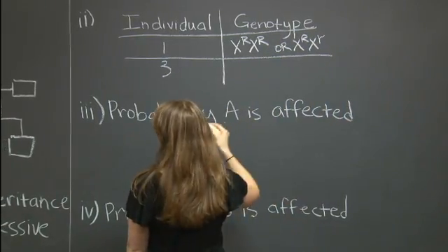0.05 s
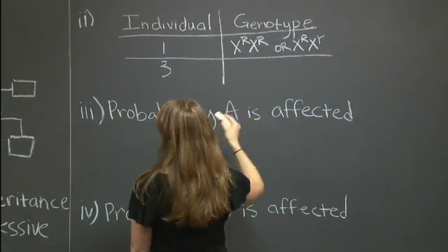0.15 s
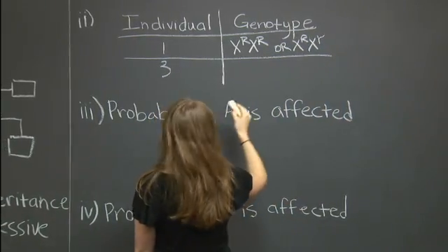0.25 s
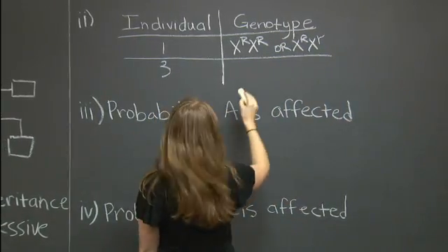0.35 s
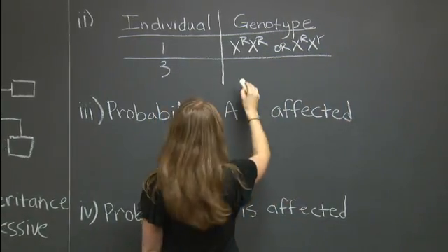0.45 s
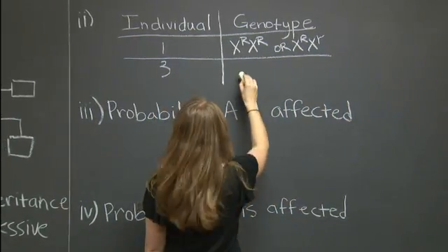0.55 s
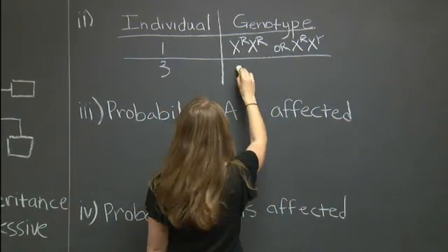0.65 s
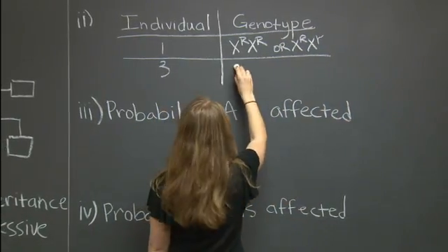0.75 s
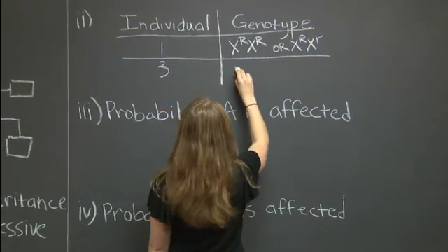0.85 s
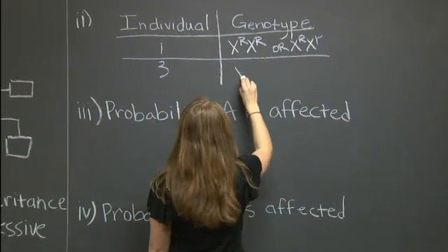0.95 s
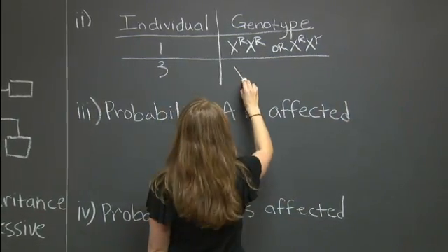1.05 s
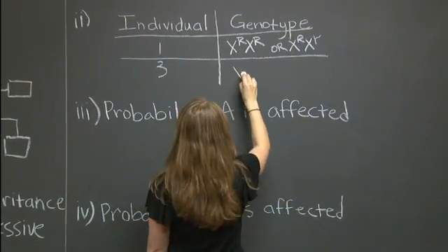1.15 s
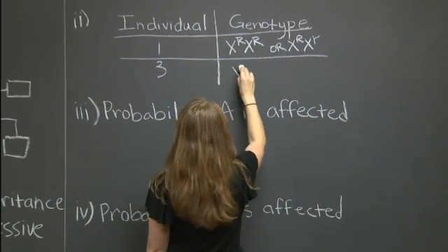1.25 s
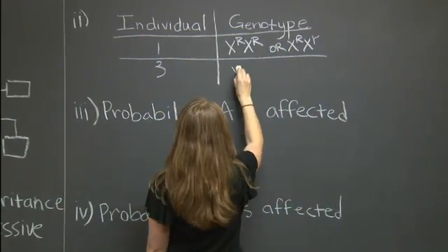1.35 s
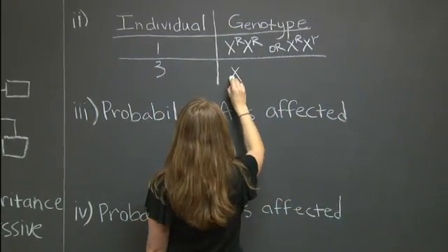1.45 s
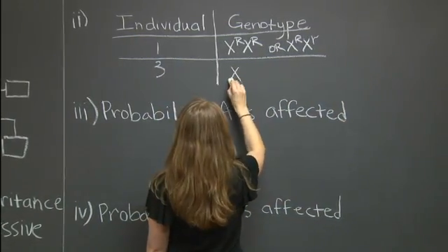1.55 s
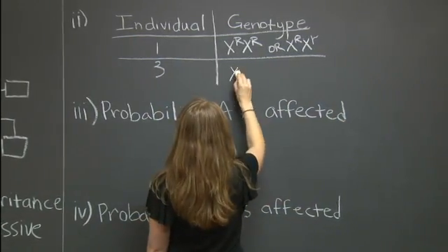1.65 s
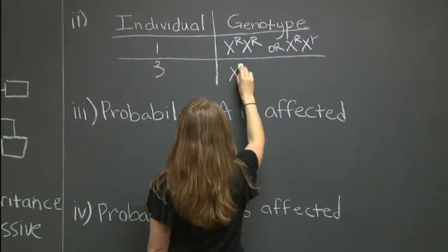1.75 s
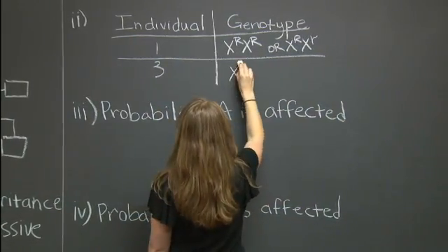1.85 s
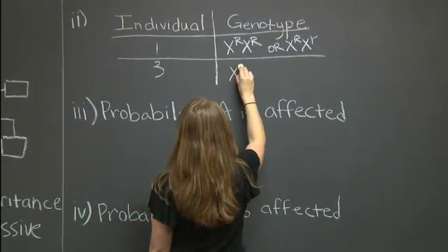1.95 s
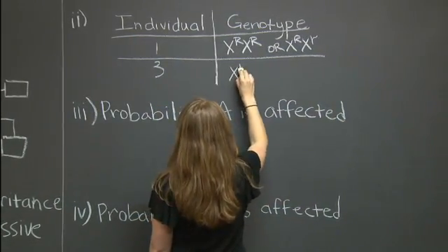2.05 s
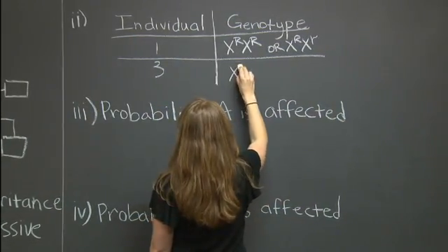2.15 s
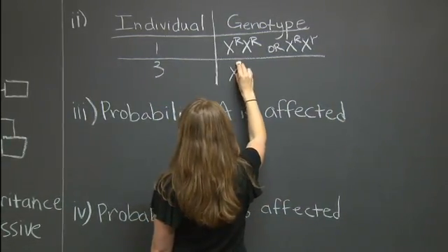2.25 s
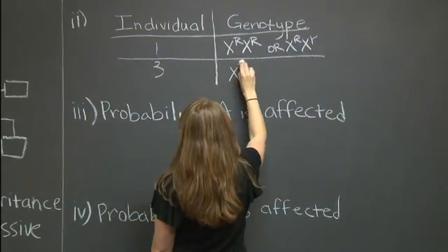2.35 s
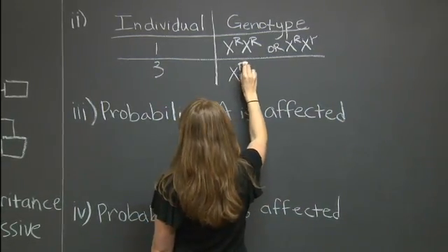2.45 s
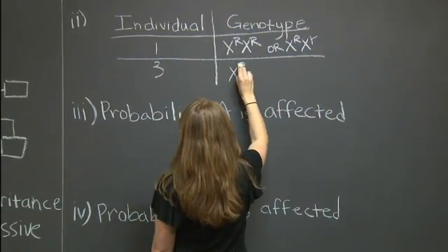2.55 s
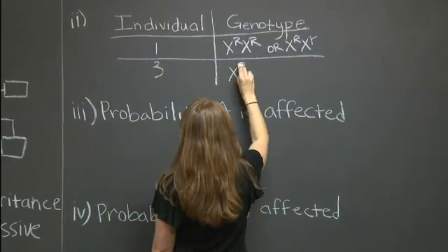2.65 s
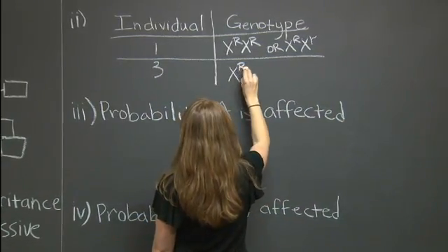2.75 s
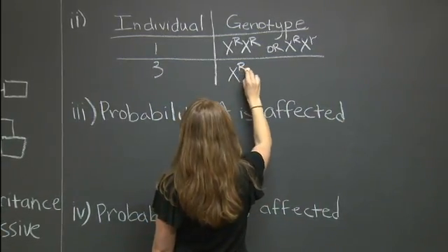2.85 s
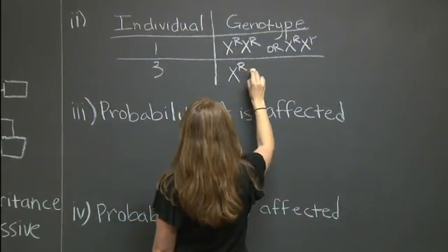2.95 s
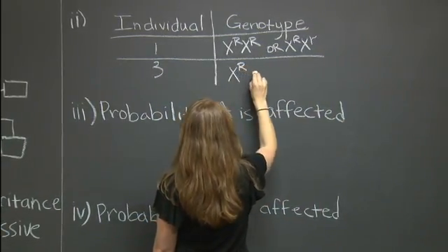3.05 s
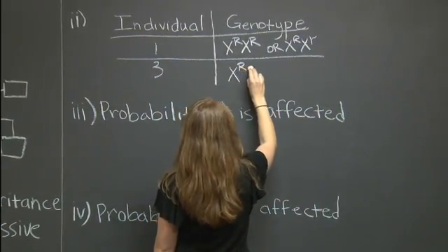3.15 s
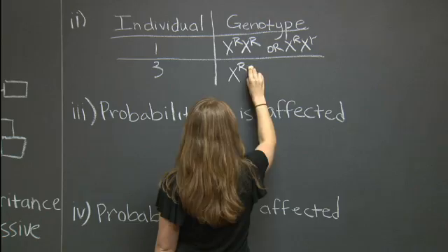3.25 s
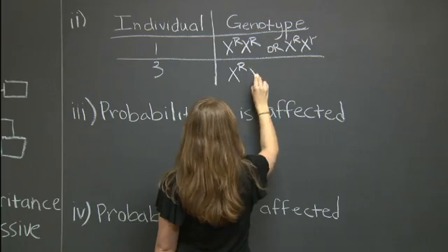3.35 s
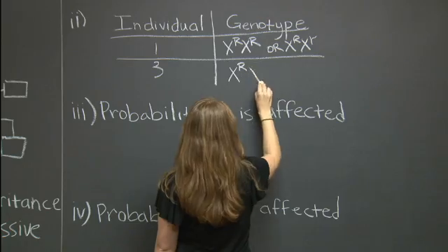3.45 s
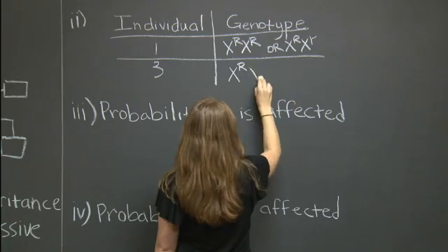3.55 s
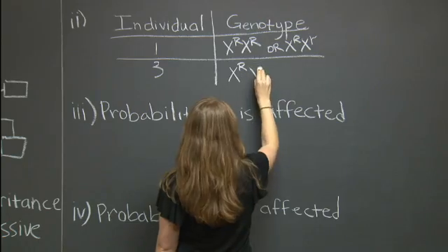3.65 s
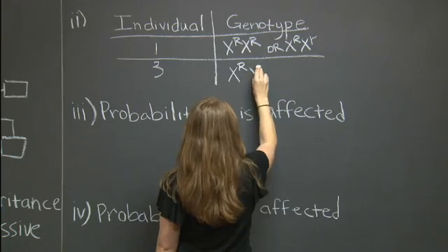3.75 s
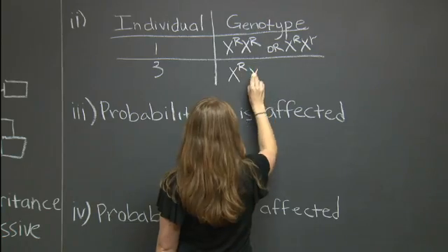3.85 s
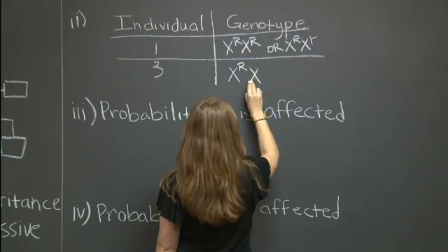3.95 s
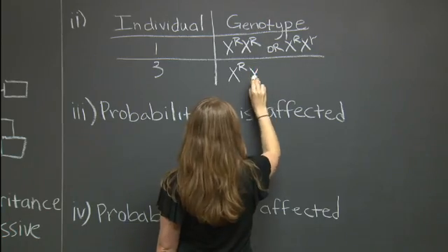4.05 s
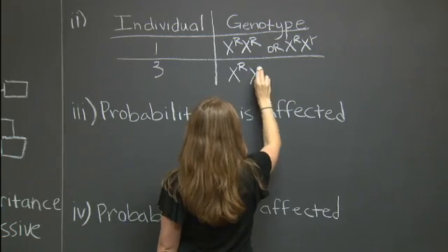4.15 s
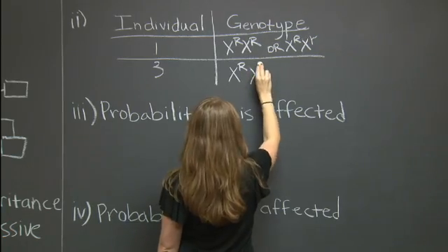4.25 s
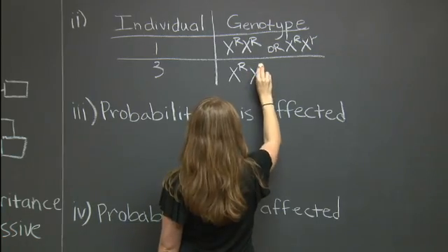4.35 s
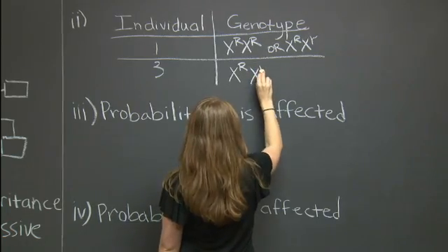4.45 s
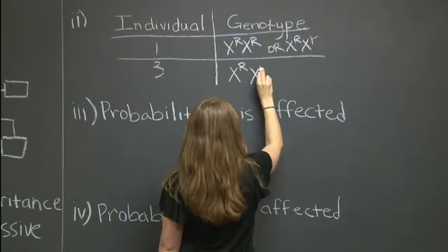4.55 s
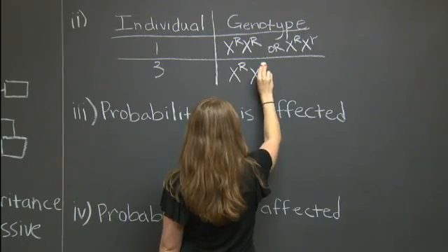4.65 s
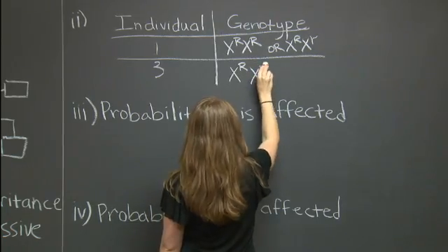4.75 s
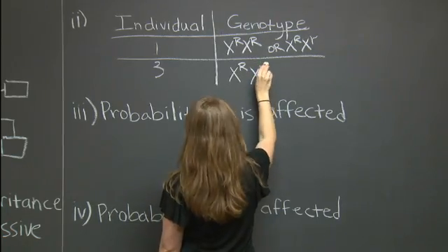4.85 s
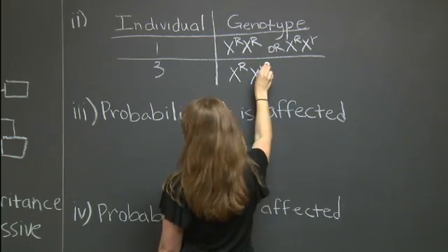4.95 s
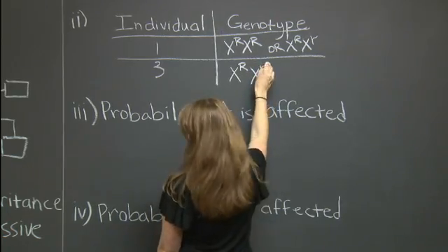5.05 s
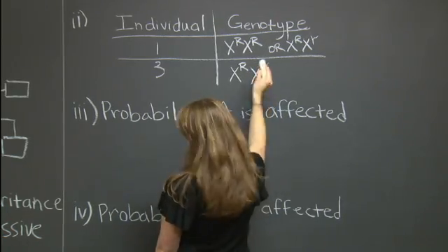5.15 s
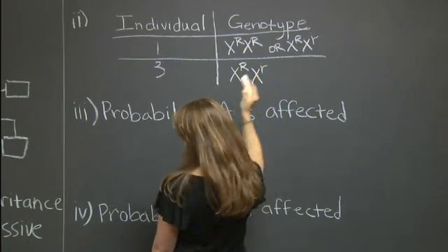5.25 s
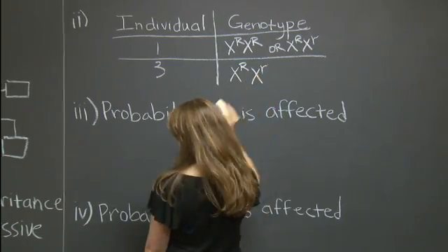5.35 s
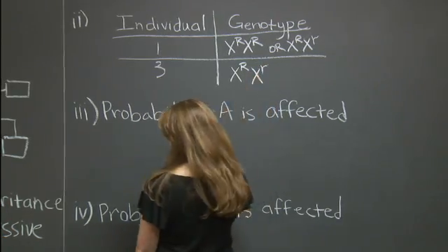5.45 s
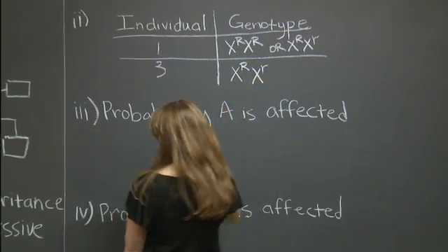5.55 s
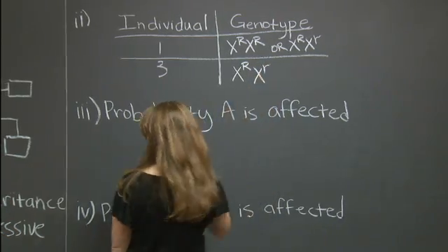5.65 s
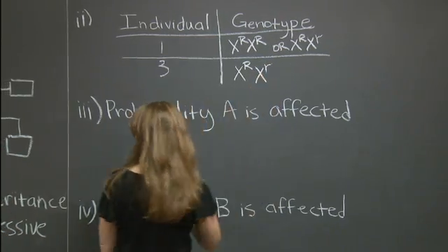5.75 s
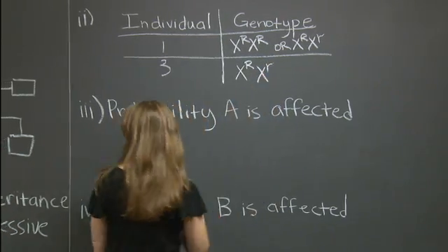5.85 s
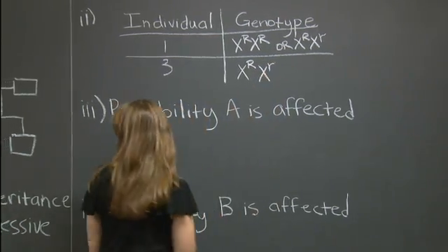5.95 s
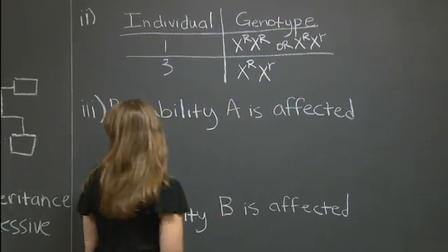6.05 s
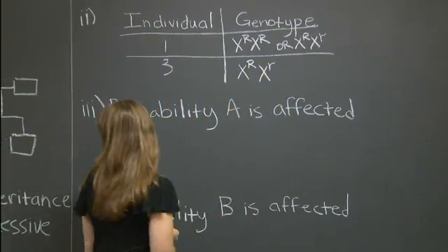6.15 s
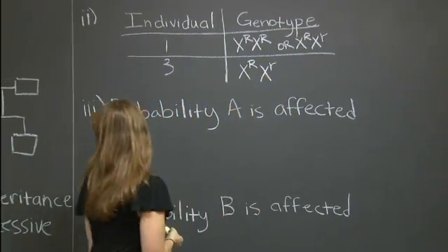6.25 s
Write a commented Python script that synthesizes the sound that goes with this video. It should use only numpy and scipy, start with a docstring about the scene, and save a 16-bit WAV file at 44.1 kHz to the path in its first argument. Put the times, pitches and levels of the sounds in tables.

```python
"""A quiet, ventilated classroom, where someone writes a few letters with chalk on a blackboard.
Most strokes begin with a tap: the board rings with a knock and the chalk tip crumbles a little.
Then the chalk scrapes over the slate, catching and slipping thousands of times a second.
Now and then the hand rubs faintly on the board, or the chalk knocks lightly as it lifts off.
At the end the writer steps aside with a faint rustle of clothes. Air rushes softly throughout."""
import sys
import numpy as np
from scipy import signal
from scipy.fft import rfft, irfft
from scipy.io import wavfile

SR = 44100
rng = np.random.default_rng(int(sys.argv[2]) if len(sys.argv) > 2 else 0)


def unload_audio(sound):
    """Save the sound as a 16-bit wav file, at the path given as the first command line argument."""
    columns = np.transpose(np.atleast_2d(sound))
    # keep every value between -1 and 1, then stretch to whole-number steps
    steps = np.round(np.clip(columns, -1, 1) * 32767)
    wavfile.write(sys.argv[1], SR, steps.astype(np.int16))


N = 277389
TIME, FREQS = np.arange(N) / SR, np.fft.rfftfreq(N, 1 / SR)

# Levels in the tables are relative. A t60 is the time a sound takes to fade by 60 dB.
# Chalk strokes and faint rubs of the hand on the board:
# t/s, length/s, fastest point/share of length, starting speed/share of top speed,
# hiss/dB, rasp/dB, pressure change/dB, drone against rasp/dB,
# then three resonances (boosted pitches) set by grip and angle, each f/Hz, boost/dB
STROKES_AND_RUBS = [ (0.847, 0.25, 0.62, 0.29, -62.5, -54.5, -0.5, -8.5, 1630, 6, 3980, 1, 7900, 7),
                    (1.394, 0.2, 0.46, 0.48, -62, -53.5, -7, -8.5, 1560, 3.3, 4020, 4.5, 9100, 3),
                    (1.923, 0.232, 0.38, 0, -68, -57.5, -1, -9, 2600, -1, 4020, 8.5, 8600, 6),
                    (2.335, 0.2, 0.47, 0, -68.5, -57, -6, -2, 1330, 10.5, 3350, 9, 11700, 8),
                    (2.497, 0.16, 0.65, 0.3, -67, -57.5, -3, -4, 2470, 7, 3920, 7, 6900, 4.4),
                    (2.72, 0.18, 0.35, 0.1, -68.5, -57, -1, -5.5, 1200, 5, 2600, 6.2, 3470, 7),
                    (3.29, 0.26, 0.39, 0, -58.5, -52, -3.5, -14.5, 1640, 4, 4080, 6, 8150, 6.5),
                    (3.56, 0.21, 0.6, 0.45, -97, -79, 0, 8, 700, 10, 950, 9.5, 2200, 12),
                    (3.8, 0.28, 0.4, 0.1, -62.5, -53.5, -9.5, -12.5, 1640, 6.5, 2100, 6, 3520, 7),
                    (4.36, 0.2, 0.64, 0.18, -69, -55, -0.5, -12, 1620, 3.5, 4000, 9, 8000, 5),
                    (4.579, 0.2, 0.79, 0.67, -72.5, -61.5, -1, 5.5, 770, 5.5, 1180, 3.5, 3400, 9),
                    (4.78, 0.41, 0.4, 0.5, -96, -75.5, 0, 8.5, 636, 17, 895, 14, 2200, 15)]
# Tone of the hiss at the chalk tip: f/Hz, level/dB
HISS_SPECTRUM = [(2000, -24.5), (2850, -7.5), (3400, 1.5), (4300, 5.5), (4800, -4.5), (5800, 5),
                 (7400, -0.5), (8400, -1), (9800, -7), (10700, -12), (12400, -6), (13700, -11.5),
                 (14900, -14), (15600, -26)]
# Tone of the rasp in the stick and hand: f/Hz, level/dB
RASP_SPECTRUM = [(300, -19), (900, -17), (1120, -3), (1420, -8), (1540, 1.5), (1680, -0.5), (1800, -1.5),
                 (1980, -1.5), (2250, -9.5), (2480, -12), (2800, -24.5), (4000, -35.5)]
# Tone of the scraped board's drone: f/Hz, level/dB
DRONE_SPECTRUM = [(200, -12), (400, -27.5), (560, -6), (760, -3), (950, -2), (1200, 2), (1450, -4),
                  (2000, -41.5)]
# Chalk knocking on the board as it lands or lifts off: t/s, knock/dB,
# knock cutoff/Hz (lower is softer), crunch/dB, crunch tilt/(dB per octave), ring of the tip/Hz
TAPS = [(0.7768, -31.5, 560, -47.5, 2.5, 8800), (1.3669, -31, 706, -49.5, -1.5, 4150),
        (1.8961, -32.5, 1305, -46.5, -6, 6170), (2.3082, -29, 975, -48, -2, 15200),
        (3.2726, -27.5, 1480, -46, 3, 4210), (3.7983, -25.5, 2050, -41, -1, 3410),
        (4.043, -67, 1100, -80, 0, 4000), (4.3304, -28.5, 1230, -48.5, 3, 12500),
        (4.829, -72, 1988, -84, 0, 3990), (5.128, -76, 1500, -80, 4.5, 3970),
        (5.397, -62, 890, -78.5, 0.5, 4040)]
# The board's modes, the tones it rings with when hit: f/Hz, level/dB, t60/s
BOARD_MODES = [(311.9, -5, 0.153), (377.4, -7.5, 0.037), (427, -1, 0.05), (467, -16.5, 0.2),
               (634, -25, 0.3), (692, -14, 0.12), (729.6, -12.5, 0.05), (815, -2.5, 0.035), (878, -21, 0.2),
               (990, 4, 0.06), (1077, -26.5, 0.13), (1160, -1, 0.034), (1290, 5.5, 0.017),
               (1436, 3.5, 0.049), (1620, -2, 0.051), (1641, 12.5, 0.14), (1803, -16.5, 0.14),
               (1898, 3, 0.028), (2090, 10.5, 0.017), (2227, -8, 0.071), (2480, -8.5, 0.034),
               (2740, -5, 0.027), (3353, 9, 0.02)]
# Tone of the crumbling tip: f/Hz, level/dB
CRUNCH_SPECTRUM = [(200, -42), (1500, -13.5), (2700, -6.5), (3900, 1.5), (4900, -1), (6600, 4),
                   (8200, -6.5), (9300, -1.5), (11500, -11.5), (15500, -8.5), (17000, -27.5)]
# First echoes of a tap: delay/ms, gain/factor
EARLY_ECHOES = [(1.61, .84), (2.62, .48), (8.15, .2)]
# How long the classroom echoes: f/Hz, t60/s
ROOM_DECAY = [(250, 0.32), (700, 0.31), (1500, 0.11), (3000, 0.24), (10000, 0.17)]
# The arm reaches up, later the body turns and steps aside: t/s, length/s, level/dB
BODY_MOVES = [(-0.15, 0.12, -63.5), (0.415, 0.24, -67), (5.299, 0.23, -68.5), (5.43, 0.55, -63.5),
              (6.05, 0.28, -67.5)]
# Tone of rubbing clothes: f/Hz, level/dB
CLOTH_SPECTRUM = [(150, 7), (350, -4.5), (560, 5.5), (780, -5.5), (950, -3), (1500, -7), (2250, -6.5),
                  (2600, -14), (3200, -13), (4000, -17), (6000, -24.5), (10000, -28.5), (15000, -29)]
# Soft footsteps: t/s, level/dB, length/s
FOOTSTEPS = [(5.522, -60.5, 0.28), (5.69, -57.5, 0.072)]
# Tone of a thud on the floor: f/Hz, level/dB
FLOOR_SPECTRUM = [(20, -5), (35, 5.5), (80, 0), (170, -9), (300, -7), (700, -59)]
# Tone of the rushing air: f/Hz, level/dB
AIR_SPECTRUM = [(15, -38.5), (25, -18.5), (50, 3), (80, 0), (175, 1), (250, -6.5), (300, -7.5), (370, -15),
                (650, -17.5), (1000, -23.5), (2100, -28.5), (4000, -33.5), (12000, -41), (15000, -56)]
# Faint steady whine in the room: f/Hz, level/dB
WHINE_TONES = [(1380, -89.5), (1995, -95), (2825, -97)]


def scrapes_and_rubs(slips_per_s=14000, chatter_db=0.5, chatter_hz=70, rasp_trim_db=-3.0):
    """Chalk or hand slides in countless tiny slips that hiss, rasp and make the board drone."""
    slips = rng.standard_normal(N) * (rng.random(N) < slips_per_s / SR)
    slips *= amp(chatter_db * flutter(chatter_hz))  # the grip varies along the way
    out = np.zeros(N)
    for row in STROKES_AND_RUBS:
        start, length, fastest, first_speed, hiss_db, rasp_db, press_db, drone_db, *boosts = row
        touching = (TIME > start) & (TIME < start + length)
        t, friction = TIME[touching] - start, slips[touching]
        peaks = np.reshape(boosts, (-1, 2))
        speed, contact = hand_motion(t, length, fastest, first_speed)
        pressure = amp(press_db * (t / length - .5))  # the hand bears down or eases off steadily
        # speed makes the hiss grow more steeply than the rasp
        hiss = amp(hiss_db) * speed ** 2.1 * colour(friction, HISS_SPECTRUM, peaks)
        rasp_gain = amp(rasp_db + rasp_trim_db) * pressure * speed ** 1.1
        rasp = colour(friction, RASP_SPECTRUM, peaks)
        drone = amp(drone_db) * colour(friction[::-1], DRONE_SPECTRUM, peaks)
        out[touching] += contact * (hiss + rasp_gain * (rasp + drone))
    return out


def hand_motion(t, length, fastest, first_speed, end_speed=0.12, bite_s=0.012, lift_s=0.012):
    """The hand speeds up, then slows down. Gives speed and contact with the board, both 0 to 1."""
    arch = np.interp(t / length, [0, fastest, 1], [0, np.pi / 2, np.pi])
    slowest = np.where(arch < np.pi / 2, first_speed, end_speed)
    speed = slowest + (1 - slowest) * np.sin(arch)
    contact = np.clip(np.minimum(t / bite_s, (length - t) / lift_s), 0, 1)
    return speed, contact


def board_knocks(bass_cut_hz=301, crowd_db=-11, crowd_t60=0.29, spread_s=0.0045):
    """Each tap makes the board ring; a softer tap wakes only its lower tones."""
    t = np.arange(SR // 2) / SR
    ring = sum(amp(db - 60 * t / t60) * np.sin(2 * np.pi * hz * t) for hz, db, t60 in BOARD_MODES)
    ring = early_echoes(ring, strength=1)
    ring = butter(ring, bass_cut_hz, "high", order=4)  # the board gives off little bass
    crowd_gain = amp(crowd_db - 60 * t / crowd_t60) * np.minimum(t / spread_s, 1)
    out = np.zeros(N)
    for start, db, cutoff_hz, *_ in TAPS:
        # waves spread over the board and wake a crowd of weak tones, different at every spot
        crowd = butter(rng.standard_normal(len(t)), hz=560, kind="high", order=2)
        crowd = butter(crowd, hz=3200, kind="low", order=6)
        knock = butter(ring + crowd_gain * unit(crowd), cutoff_hz, "low", order=3)
        add(out, start, amp(db) * knock)
    return out


def tip_crunches(trim_db=-9, crumble_s=0.00018, ring_db=-13, ring_t60=0.0097):
    """At each tap the chalk tip crumbles for about a millisecond and rings briefly."""
    t = np.arange(1024) / SR
    hz, lead_s = np.fft.rfftfreq(len(t), 1 / SR), t[-1] / 2
    age = np.maximum(t - lead_s, 0) / crumble_s
    octaves = np.log2(np.maximum(hz / 6000, .5))
    out = np.zeros(N)
    for start, _, _, db, tilt_db, ring_hz in TAPS:
        burst = rng.standard_normal(len(t)) * age * np.exp(-age)
        # the grains break at random moments, but the tip sets their tone
        spectrum = amp(read(CRUNCH_SPECTRUM, hz) + tilt_db * octaves)
        grit = irfft(spectrum * np.exp(1j * np.angle(rfft(burst))))
        ring = np.sin(2 * np.pi * ring_hz * t) * amp(-60 * t / ring_t60)
        add(out, start - lead_s, amp(db + trim_db) * unit(grit))
        add(out, start, amp(db + trim_db + ring_db) * unit(ring))
    return early_echoes(out, strength=0.25)


def early_echoes(x, strength):
    """A sound is followed by its first few reflections, each a delayed, weaker copy."""
    out = x.copy()
    for ms, gain in EARLY_ECHOES:
        add(out, ms / 1000, strength * gain * x)
    return out


def room_echo(x, build_s=0.0055):
    """Many reflections blur into a tail that builds quickly; each pitch fades at its own speed."""
    hz, t, noise = signal.stft(rng.standard_normal(SR // 2), SR, nperseg=256)
    fade = amp(-60 * t / read(ROOM_DECAY, hz)[:, None])
    _, tail = signal.istft(noise * fade, SR, nperseg=256)
    tail *= np.minimum(np.arange(len(tail)) / SR / build_s, 1) ** 2
    return signal.fftconvolve(x, tail / np.linalg.norm(tail))[:N]


def clothes_rustle(crumple_db=0.7, crumple_hz=40, rise_s=0.069, fade_db_per_s=73):
    """Cloth rubs as the writer moves; each rustle swells, holds and dies away."""
    rubbing = rng.standard_normal(N) * amp(crumple_db * flutter(crumple_hz))
    loudness = np.zeros(N)
    for start, length, db in BODY_MOVES:
        swell = np.clip((TIME - start) / rise_s, 0, 1)
        fade_db = fade_db_per_s * np.maximum(TIME - start - length, 0)
        loudness = np.maximum(loudness, swell * amp(db - fade_db))
    return loudness * colour(rubbing, CLOTH_SPECTRUM)


def footsteps():
    """The writer's weight comes down on the floor in two soft thuds."""
    weight = np.zeros(N)
    for start, db, length in FOOTSTEPS:
        add(weight, start, amp(db) * np.hanning(round(length * SR)))
    return weight * colour(rng.standard_normal(N), FLOOR_SPECTRUM)


def ventilation(air_db=-61.5, waver_db=2.1, waver_hz=6, drift_hz=1.7):
    """Moving air makes a low, gently wavering rush, with a faint whine whose pitch drifts a little."""
    rush = amp(air_db + waver_db * flutter(waver_hz)) * colour(rng.standard_normal(N), AIR_SPECTRUM)
    drift = np.cumsum(drift_hz * flutter(hz=1.4)) / SR
    whine = sum(amp(db) * np.sqrt(2) * np.sin(2 * np.pi * (hz * TIME + drift)) for hz, db in WHINE_TONES)
    return rush + whine


def amp(db):
    """Turns decibels into a factor to multiply by."""
    return 10 ** (np.asarray(db) / 20)


def unit(x):
    """Scales a signal to an average strength (rms) of 1."""
    return x / np.sqrt(np.mean(x ** 2) + 1e-20)


def read(points, hz):
    """Looks up a table at any frequency, blending between rows on a pitch-like (log) scale."""
    f, value = np.transpose(points)
    return np.interp(np.log(hz + 1), np.log(f + 1), value)


def add(mix, start_s, sound):
    """Mixes a sound in at the given time."""
    part = mix[max(round(start_s * SR), 0):][:len(sound)]
    part += sound[:len(part)]


def colour(x, spectrum, peaks=(), width_hz=90, widen=0.016):
    """Shapes a signal's tone with a table and optional peaks (f/Hz, boost/dB), at strength 1."""
    hz = np.fft.rfftfreq(len(x), 1 / SR)
    db = read(spectrum, hz)
    for centre, boost_db in peaks:
        db = db + boost_db * np.exp(-((hz - centre) / (width_hz + widen * centre)) ** 2)
    return unit(irfft(rfft(x) * amp(db), len(x)))


def flutter(hz):
    """Random wavering, up to about hz times a second, at strength 1."""
    return unit(irfft(rfft(rng.standard_normal(N)) / (1 + (FREQS / hz) ** 4), N))


def butter(x, hz, kind, order):
    """Keeps the "low" or "high" side of a frequency; a higher order cuts more sharply."""
    return signal.sosfilt(signal.butter(order, hz, kind, fs=SR, output="sos"), x)


def scene(board_echo_db=-17, writing_echo_db=-18):
    """Knocks and writing echo in the room, over the writer's movements and the air, in mono."""
    board = board_knocks()
    writing = tip_crunches() + scrapes_and_rubs()
    echo = room_echo(amp(board_echo_db) * board + amp(writing_echo_db) * writing)
    return (board + writing + echo + clothes_rustle() + footsteps() + ventilation())[None]


def record(dry, ceiling=.43, top_hz=15650):
    """Rounds off the peaks of the hardest knock, then removes the very highest treble."""
    rounded = dry / (1 + (dry / ceiling) ** 6) ** (1 / 6)
    treble_cut = signal.firwin(401, top_hz, window=("kaiser", 9), fs=SR)
    return signal.oaconvolve(rounded, treble_cut[None], "same")


dry = scene()
out = record(dry)
unload_audio(out)
```